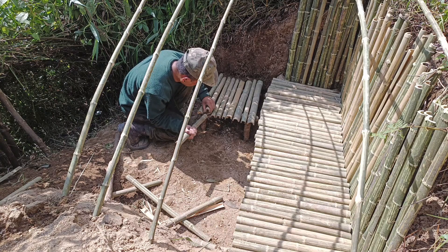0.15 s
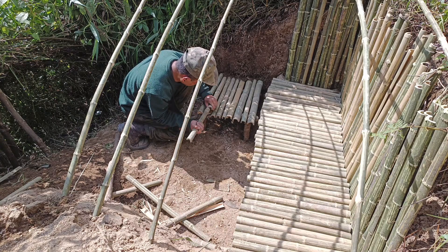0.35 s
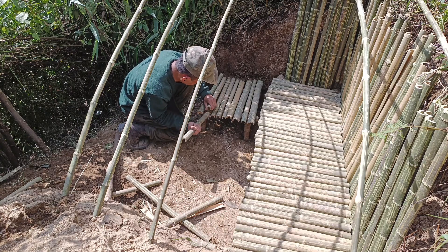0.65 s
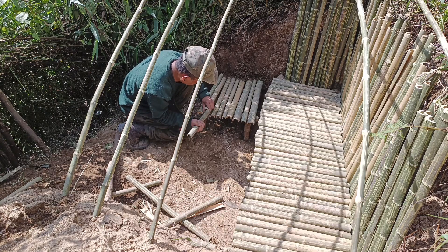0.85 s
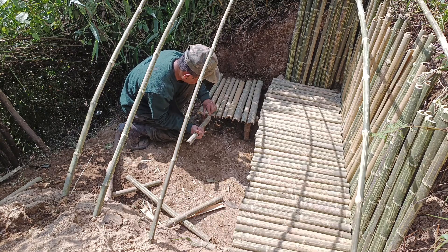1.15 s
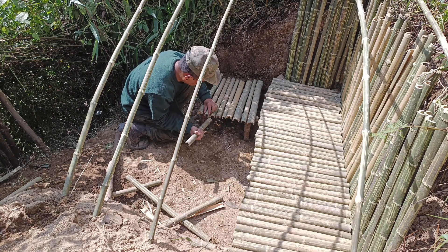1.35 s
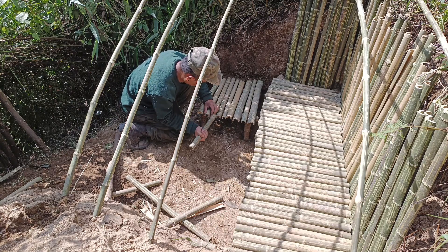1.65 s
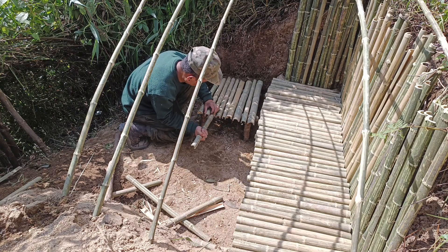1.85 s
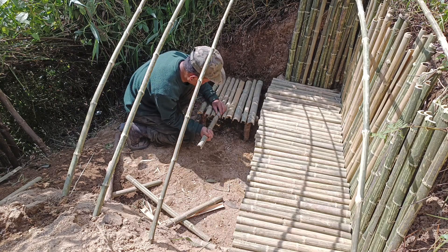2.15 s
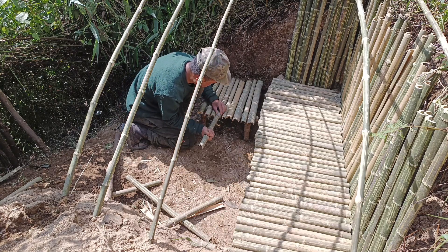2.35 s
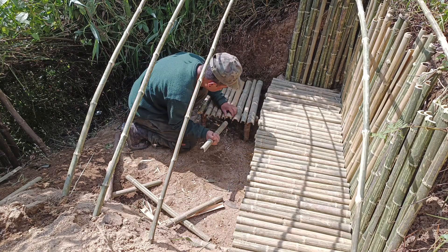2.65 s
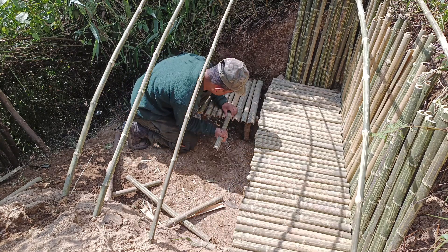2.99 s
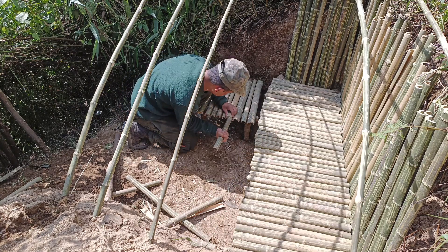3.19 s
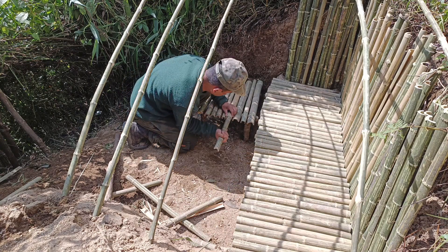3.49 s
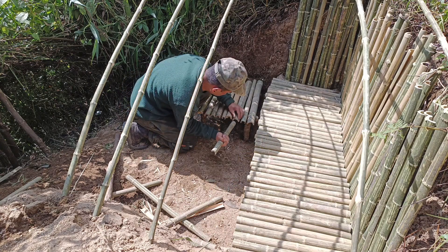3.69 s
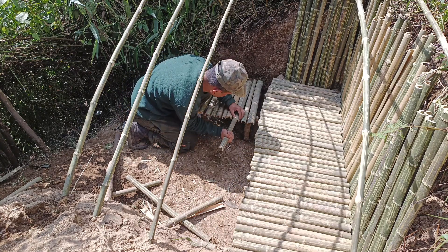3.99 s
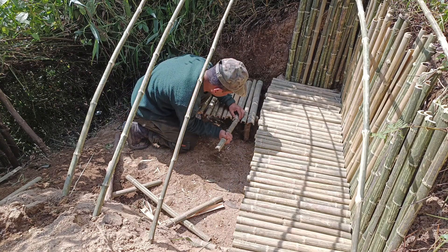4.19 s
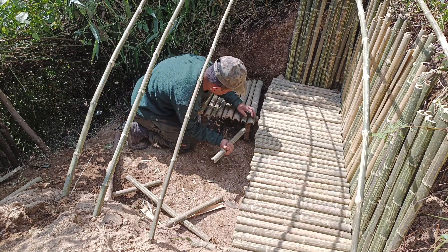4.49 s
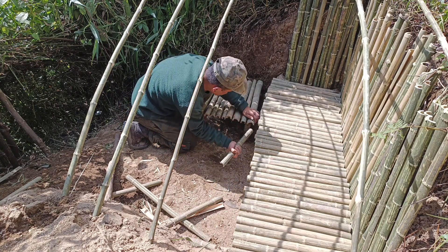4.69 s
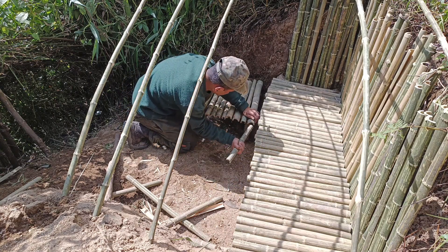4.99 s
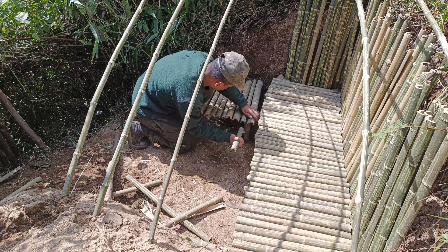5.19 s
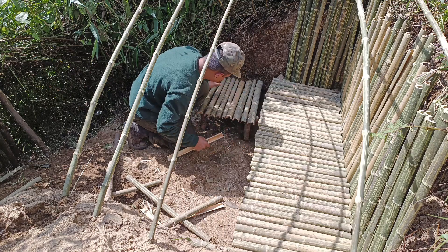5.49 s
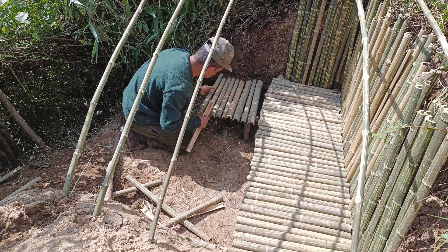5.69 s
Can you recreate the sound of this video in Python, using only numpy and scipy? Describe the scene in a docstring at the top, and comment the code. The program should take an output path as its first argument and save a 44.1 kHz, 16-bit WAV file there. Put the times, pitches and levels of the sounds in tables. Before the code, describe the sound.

A short piece of bamboo slides and taps faintly in a hand, close to the microphones. From about 0.5 seconds sharp blows trim it, each a brief hollow clack with a crack of fibres and a dull thump in the earth, varying in pitch and strength. Three land by 1 second, four between 1.8 and 2.6, three between 3.1 and 3.6, a pair at 4.2 and 4.4, and a last pair at 5 and 5.2. Short reflections and a faint echo follow them, with light handling taps in between. Insects buzz quietly all around throughout, one chirping rhythmically until it fades before 4 seconds. A far bird twitters from 0.7 to 2 seconds; another gives three falling calls and a held note from 4.7. From 5.2 seconds clothes rustle softly, with small bumps on the soil and a final slide and tap of bamboo near 5.8.

```python
"""Close to the microphones a short piece of bamboo slides and taps in a hand; then sharp blows trim it,
mostly in pairs and threes. Each is a hollow clack with a crack of fibres and a dull thump in the bare
earth where the worker kneels; bamboo walls scatter it back and a thicket echoes faintly behind.
Insects buzz all around, small birds twitter far off, and at the end clothes rustle as the worker sits up.
"""
import sys
import numpy as np
from scipy import signal
from scipy.fft import rfft, irfft
from scipy.io import wavfile

SR = 44100
rng = np.random.default_rng(int(sys.argv[2]) if len(sys.argv) > 2 else 0)


def put_to_file(sound):
    """Save the sound as 16-bit audio at rate SR, in the file named by the first command-line argument."""
    columns = np.atleast_2d(sound).T  # one column per channel
    safe = np.clip(columns, -1, 1)
    whole_steps = np.round(safe * 32767)
    wavfile.write(sys.argv[1], SR, whole_steps.astype(np.int16))


N = 257544
TIME = np.arange(N) / SR
SHORT = TIME[:8192]   # time axis of one hit

# blows; grip and cut set the four pitches, the spot struck favours the splint (+) or the edge (-):
# (time [s], strength [dB], hardness [dB/octave], spot [dB],
#  knock [Hz], hollow [Hz], splint [Hz], edge [Hz])
BLOWS = [(0.46, -28.5, -2.5, -13, 462, 1428, 2130, 3310), (0.7303, -23, 0, 4, 860, 1515, 2270, 2740),
         (0.9745, -23, 2.5, -6, 746, 1455, 2040, 3005), (1.7931, -28, -6.5, 2.5, 800, 1470, 1900, 2650),
         (2.0344, -28.3, -0.6, 3.5, 950, 1520, 1880, 3580), (2.341, -29, -1.54, -2, 720, 1465, 2073, 4100),
         (2.5651, -25.5, 1, 1.5, 961, 1480, 2130, 3090), (3.1167, -26.5, 2, -1, 493, 1251, 2026, 3200),
         (3.3542, -23.5, 2.5, 1.5, 525, 1273, 2057, 2730), (3.6012, -26, 2.5, 0.5, 523, 1330, 2030, 3430),
         (4.167, -28, 0.26, 3, 836, 1510, 2237, 4170), (4.4207, -26, 1.15, -3.5, 767, 1257, 1894, 2790),
         (4.9777, -27.5, -4.5, -2.5, 685, 1363, 2434, 2680), (5.232, -23, 0.8, -6.5, 810, 1667, 2430, 4236)]
# knock, hollow, splint and edge:
# (level re the blow [dB], t60 [s], gain by hardness [dB per dB/octave], gain by spot [dB/dB])
NOTES = [(-7, 0.026, 0, 0.5), (-0.87, .034, -0.17, 0), (-2.5, 0.024, 1.16, 1), (-11, 0.018, 1.16, -0.57)]
# modes of the piece's wall: (frequency [Hz], relative level [dB], t60 [s])
WALL_MODES = [(341.5, -8.5, 0.036), (555, -9.5, 0.019), (776, -5, 0.034), (943, 2.5, 0.0039),
              (1380, -3, 0.022), (1686, 0, 0.024), (2090, -0.5, 0.024), (2331, -2, 0.01),
              (2341, -0.5, 0.025), (2817, -2, 0.0085), (3200, -10.5, 0.021), (3390, -1.5, 0.0097),
              (3870, -5.5, 0.011), (4360, -7, 0.0073), (5520, -23, 0.012), (5280, -12, 0.006)]
# gap between a blow's bite and its quick echo as the work goes on: (time [s], delay [ms])
ECHO_DELAYS = [(0.6, 2.35), (1.85, 3.95), (2.55, 3.23), (3.1, 1.96), (4.97, 1.7), (5.23, 2.54)]
# colour of cracking fibres: (frequency [Hz], gain [dB])
CRACK_COLOUR = [(400, -7.5), (1500, -1), (3000, 12), (4800, -1.5), (6500, -2), (9000, -5), (12000, -14.5),
                (16000, -35)]
# light touches as the piece is turned in the hand: (time [s], relative level [dB])
TOUCHES = [(0.2094, -46.5), (0.3252, -47.5), (2.8699, -48.5), (4.6169, -50.5), (4.8514, -49), (5.7673, -50),
           (5.7857, -43)]
# the piece slides through the hand: (time [s], length [s], level [dB])
SLIDES = [(0.095, 0.084, -62), (3.934, 0.046, -66), (5.754, 0.065, -55.5)]
# colour of that friction: (frequency [Hz], gain [dB])
SLIDE_COLOUR = [(500, -6), (1200, -16), (2100, 3), (2700, -19.5), (4000, -16), (12000, -25)]
# dull bumps on the soil: (time [s], pitch [Hz], level [dB])
BUMPS = [(4.994, 70, -44), (5.282, 374, -55), (5.312, 382, -63), (5.566, 450, -60.5)]
# colour of rubbing cloth: (frequency [Hz], gain [dB])
CLOTH_COLOUR = [(80, -8), (250, -1.5), (450, 5), (900, -2.5), (2000, -12.5), (5000, -16), (10000, -13),
                (15000, -17)]
# distant bird phrases, a high twitter and a falling two-note call:
# (time into the phrase [s], length [s], start pitch [Hz], end pitch [Hz], relative level [dB])
TWITTER = [(0, .045, 4750, 5900, -70.5), (.11, .06, 5800, 3950, -66.5), (.19, .085, 6150, 6850, -70.5),
           (.3, .075, 7200, 6200, -73)]
CALL = [(0, .06, 3380, 3170, -64), (.07, .06, 3080, 2500, -66)]
# starts of the falling call: (time [s])
CALL_STARTS = [4.7, 5.075, 5.365]
# far insect choruses: (centre [Hz], width [Hz], level [dB])
CHORUSES = [(3230, 357, -72), (6256, 2700, -85.5)]
# colour of the open air: (frequency [Hz], gain [dB])
AIR_COLOUR = [(25, -4.5), (60, -5), (130, -4.5), (220, 3), (300, -3), (450, 2), (700, -4), (1300, -6),
              (2300, -6.5), (2900, -14), (4200, -13), (6500, -14), (10000, -19), (15000, -18)]
# colour of the sound scattered by ground, walls and leaves: (frequency [Hz], gain [dB])
SCATTER_COLOUR = [(100, -5.5), (400, -5), (1200, -0.5), (2800, 3.5), (6000, 4), (14000, 5)]
# colour of the late echo from the thicket: (frequency [Hz], gain [dB])
THICKET_COLOUR = [(100, -9.5), (600, -5.5), (1500, -10.5), (2800, -1.5), (4200, -7.5), (14000, -7)]
# likeness of diffuse sound at the two microphones: (frequency [Hz], correlation [0..1])
LIKENESS = [(60, 0.76), (400, 0.54), (1200, 0), (3000, 0.94), (8000, 0)]
# the right microphone's port rings and then cancels: (frequency [Hz], gain [dB], Q [ratio])
RIGHT_PORT = [(2500, 1.5, 0.58), (6540, 20, 2.64), (8710, -33.5, 3.59)]


def blows():
    """The trimming, close up: returns the broad clacks and the pitched notes of the struck piece."""
    clacks, notes = np.zeros((2, N))
    for s, db, hardness, spot, *pitches in BLOWS:
        echo_ms = np.interp(s, *np.transpose(ECHO_DELAYS))
        force = contact(echo_ms, echo_gain=0.43, tearing=1.0, tear_t60=0.013)
        crack_db = db - 11.5 + 4 * hardness   # harder blows split more fibres
        # the soil takes up only a share of a blow's extra strength; a later echo goes with a softer thump
        thump_db = -29 + 0.61 * db - 2 * echo_ms
        clack = piece_wall(force, tilt_db_per_octave=0.42 * hardness, spread_db=2.5, detune=0.054)
        add(clacks, s, from_db(db + 1) * clack)
        add(clacks, s, from_db(crack_db) * crack(echo_ms))
        add(clacks, s, from_db(thump_db) * thump())
        # the piece bends (knock), its hollow rings, and so do the splint and the cut edge
        for hz, (note_db, t60, by_hardness, by_spot) in zip(pitches, NOTES):
            gain = from_db(db + note_db + by_hardness * hardness + by_spot * spot)
            add(notes, s, gain * unit_hit(ring(force, hz, t60)))
    return clacks, notes


def contact(echo_ms, echo_gain, tearing, tear_t60):
    """The bite and its quick echo, each followed by a burst of snapping fibres that carry no bass."""
    force = np.zeros(len(SHORT))
    for s, strength in [(0, 1), (echo_ms / 1000, echo_gain)]:
        snaps = rng.standard_normal(len(SHORT)) ** 3 * dying(SHORT, tear_t60)
        fibres = signal.sosfilt(signal.butter(2, 1100, "high", fs=SR, output="sos"), snaps)
        push = tearing * fibres / np.linalg.norm(fibres) + (SHORT == 0)
        force += strength * np.roll(push, round(s * SR))
    return force


def piece_wall(force, tilt_db_per_octave, spread_db, detune):
    """The bamboo's modes; spot and grip weight and shift them anew, hard contact favours high ones."""
    out = 0
    for k, (hz, db, t60) in enumerate(WALL_MODES):
        gain = from_db(db + tilt_db_per_octave * np.log2(hz / 1800) + spread_db * rng.standard_normal())
        shifted_hz = hz * (1 + rng.uniform(-detune, detune))
        out += (-1) ** k * gain * unit_hit(ring(force, shifted_hz, t60))
    return unit_hit(out)


def crack(echo_ms, snap_t60=0.012, echo_gain=0.66, rise_s=0.0038):
    """The split opens in a burst, echoed a few milliseconds later, and sets the hard skin ringing."""
    since_echo = SHORT - echo_ms / 1000
    bite = (1 - np.exp(-SHORT / rise_s)) * dying(SHORT, snap_t60)
    echo = echo_gain * (since_echo > 0) * dying(np.abs(since_echo), snap_t60)
    snaps = unit_hit(coloured(rng.standard_normal(len(SHORT)), CRACK_COLOUR) * (bite + echo))
    skin = unit_hit(ring(snaps, hz=5801, t60=0.021))
    return snaps + from_db(-9.5) * skin


def thump(push_s=0.0006, settle_s=0.02):
    """The butt is pushed briskly into the soil, then settles more softly a moment later."""
    push = np.exp(-(SHORT / push_s - 2) ** 2)
    settling = 0.39 * np.exp(-((SHORT - settle_s * rng.uniform(0.78, 1.0)) / (2 * push_s)) ** 2)
    return unit_hit(ring(push + settling, hz=72, t60=0.02))


def touches(gain_db):
    """Small knocks on the same piece, and fainter ones at random as the fingers shift."""
    out = np.zeros(N)
    fidgets = [(s, -59 + 3 * rng.standard_normal()) for s in rng.uniform(0, TIME[-1], size=30)]
    for s, db in list(TOUCHES) + fidgets:
        force = contact(echo_ms=0.55, echo_gain=0.27, tearing=1.38, tear_t60=0.029)
        clack = piece_wall(force, tilt_db_per_octave=1.3, spread_db=5.0, detune=0.0471)
        note = unit_hit(ring(force, hz=1800, t60=0.018))
        add(out, s, from_db(db + gain_db) * unit_hit(clack + 2 * note))
    return out


def slides(grain_db):
    """Bamboo slips through the hand: grainy friction that swells and fades."""
    out = np.zeros(N)
    friction = coloured(rng.standard_normal(N) * from_db(grain_db * drift(120)), SLIDE_COLOUR)
    for s, length, db in SLIDES:
        size = int(length * SR)
        add(out, s, from_db(db) * rms_one(np.hanning(size) * friction[int(s * SR):][:size]))
    return out


def bumps(cycles):
    """The worker shifts on the soil: soft pushes, about half a cycle long, that ring for a few cycles."""
    out = np.zeros(N)
    for s, hz, db in BUMPS:
        push = np.exp(-(2 * np.pi * hz * SHORT - 2) ** 2)
        add(out, s, from_db(db) * unit_hit(ring(push, hz, t60=cycles / hz)))
    return out


def clothes(start_s=5.18, attack_s=0.24, hold_s=0.04, release_s=0.63):
    """Cloth rubs unevenly through one movement as the worker sits up."""
    corners = start_s + np.cumsum([0, attack_s, hold_s, release_s])
    movement = np.interp(TIME, corners, [0, 1, 1, 0])
    return movement * from_db(-60.5 + 2.7 * drift(45)) * wide_noise(CLOTH_COLOUR)


def birds(twitter_from_s=0.667, twitter_every_s=0.4, twitter_until_s=1.95, held_at_s=5.485):
    """Far off, blurred by leaves, one bird twitters; later another calls three times and holds a note."""
    song = phrases(TWITTER, np.arange(twitter_from_s, twitter_until_s, twitter_every_s), twitter_until_s)
    song += phrases(CALL, CALL_STARTS, held_at_s)
    add(song, held_at_s, from_db(-62.5) * whistle(0.16, start_hz=3270, end_hz=3270, waver=0.004))
    return from_db(-4) * (song + echoes(song, SCATTER_COLOUR, t60=0.35, build_s=0.004))


def phrases(notes, starts, until_s):
    """The same few notes, sung from each start until the bird breaks off."""
    out = np.zeros(N)
    for start in starts:
        for after, length, start_hz, end_hz, db in notes:
            if start + after < until_s:
                add(out, start + after, from_db(db) * whistle(length, start_hz, end_hz, waver=0.018))
    return out


def whistle(length_s, start_hz, end_hz, waver, flutter_db=4.0):
    """A thin gliding note that swells and fades, unsteady in pitch and level."""
    along = np.linspace(0, 1, int(length_s * SR))
    hz = (start_hz + (end_hz - start_hz) * along) * (1 + waver * drift(340)[:len(along)])
    flutter = from_db(flutter_db * drift(110)[:len(along)])
    swell = np.sqrt(along * (1 - along))
    return rms_one(flutter * swell * np.sin(2 * np.pi * np.cumsum(hz) / SR))


def insect_choruses(throb_db, swell_db):
    """Distant insects buzz without a break, throbbing quickly and swelling slowly."""
    return sum(buzz(hz, width_hz) * from_db(db + throb_db * drift(38) + swell_db * drift(1.7))
               for hz, width_hz, db in CHORUSES)


def near_insect(chirps_per_s=8.2, first_s=0.08, stop_s=3.8, fade_s=1.5):
    """One insect nearer the microphones chirps in rhythm, then fades to silence."""
    chirps = rms_one(np.cos(np.pi * chirps_per_s * (TIME - first_s)) ** 4)
    fade = np.clip((stop_s - TIME) / fade_s, 0, 1)
    return from_db(-69.5) * fade * chirps * buzz(hz=3440, width_hz=450)


def buzz(hz, width_hz):
    """Stridulation at a distance: a band of stereo noise."""
    t60 = np.log(1000) / (np.pi * width_hz)
    return rms_one(ring(ring(rng.standard_normal((2, N)), hz, t60), hz, t60))


def open_air():
    """The quiet bed of the place: diffuse noise whose level barely flickers."""
    return from_db(-61 + 0.43 * drift(30)) * wide_noise(AIR_COLOUR)


def wide_noise(spectrum):
    """Noise from all around, most alike at the two microphones in the bass and near 3 kHz."""
    alike = at_hz(LIKENESS, np.fft.rfftfreq(N, 1 / SR))
    mid, side = rfft(rng.standard_normal((2, N)))
    pair = irfft(np.sqrt(1 + alike) * mid + np.sqrt(1 - alike) * side * [[1], [-1]], N)
    return rms_one(coloured(pair, spectrum))


def direct(x, lag_ms, pan_db):
    """The straight path reaches the left microphone slightly earlier and louder."""
    delay = np.exp(-2j * np.pi * np.fft.rfftfreq(N, 1000 / SR) * lag_ms)
    return np.array([x * from_db(pan_db / 2), irfft(rfft(x) * delay, N) * from_db(-pan_db / 2)])


def echoes(x, spectrum, t60, build_s):
    """Dense reflections, different at each microphone, build up and die away."""
    t = TIME[:SR]
    build = 1 - np.exp(-(t / build_s) ** 2)
    response = coloured(rng.standard_normal((2, SR)), spectrum) * dying(t, t60) * build
    response /= np.linalg.norm(response, axis=1, keepdims=True)
    return signal.fftconvolve(x[None], response, axes=1)[:, :N]


def ring(force, hz, t60):
    """One mode driven by a force."""
    r, w = dying(1 / SR, t60), 2 * np.pi * hz / SR
    return signal.lfilter([1, 0, -1], [1, -2 * r * np.cos(w), r * r], force + 1e-18)


def peak_filter(x, hz, db, q):
    """A resonance or a dip."""
    gain, w = from_db(db / 2), 2 * np.pi * hz / SR
    width = np.sin(w) / (2 * q)
    numerator = [1 + width * gain, -2 * np.cos(w), 1 - width * gain]
    denominator = [1 + width / gain, -2 * np.cos(w), 1 - width / gain]
    return signal.lfilter(numerator, denominator, x)


def coloured(x, spectrum):
    """Give noise a spectrum."""
    size = x.shape[-1]
    return irfft(rfft(x) * from_db(at_hz(spectrum, np.fft.rfftfreq(size, 1 / SR))), size)


def at_hz(points, hz):
    """Read a spectrum on a log-frequency axis."""
    f, value = np.transpose(points)
    return np.interp(np.log(np.maximum(hz, 1)), np.log(f), value)


def drift(turns_per_s):
    """A random wander at rms 1."""
    knots = rng.standard_normal(2048)
    return rms_one(np.interp(TIME * turns_per_s, np.arange(len(knots)), knots))


def dying(t, t60):
    """Exponential decay, 60 dB down after t60 seconds."""
    return from_db(-60 * t / t60)


def from_db(db):
    """Decibels to amplitude."""
    return 10 ** (np.asarray(db) / 20)


def rms_one(x):
    """Scale a sound to rms 1."""
    return x / np.sqrt(np.mean(x ** 2) + 1e-20)


def unit_hit(x):
    """Give a short sound the energy of 20 ms at rms 1."""
    return x / np.sqrt(np.sum(x ** 2) / (0.02 * SR) + 1e-20)


def add(out, s, sound):
    """Mix a sound in at time s."""
    at = round(s * SR)
    out[at:at + len(sound)] += sound[:N - at]


def scene():
    """A stereo pair near the work, in a hollow between bamboo walls and a bank, the thicket behind."""
    clacks, notes = blows()
    handling = touches(gain_db=-10.5) + slides(grain_db=2.0) + bumps(cycles=5.5)
    work = clacks + notes + handling
    # the clack spreads all round, while the notes leave mainly by the open end
    spread = clacks + handling + from_db(-9) * notes
    ground = from_db(-8.5) * echoes(work, SCATTER_COLOUR, t60=0.014, build_s=0.0015)
    walls = from_db(-10.5) * echoes(spread, SCATTER_COLOUR, t60=0.081, build_s=0.0059)
    thicket = from_db(-31) * echoes(clacks, THICKET_COLOUR, t60=0.33, build_s=0.028)
    outdoors = birds() + open_air() + insect_choruses(throb_db=1.0, swell_db=2.9) + near_insect()
    return direct(work, lag_ms=0.022, pan_db=1.0) + ground + walls + thicket + clothes() + outdoors


def record(dry):
    """The right microphone's port colours its channel; peaks are rounded and the top is cut."""
    left, right = dry
    for hz, db, q in RIGHT_PORT:
        right = peak_filter(right, hz, db, q)
    rounded = np.tanh(np.array([left, right]))
    cutoff_hz = 15700
    return signal.sosfilt(signal.ellip(10, 0.2, 80, cutoff_hz, fs=SR, output="sos"), rounded)


dry = scene()
out = record(dry)
put_to_file(out)
```